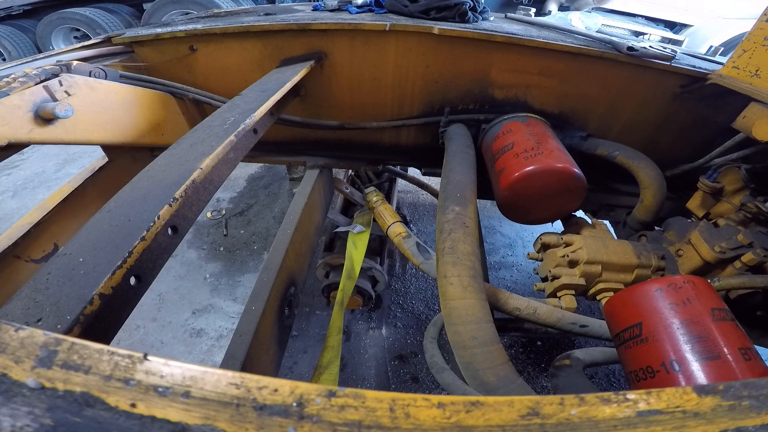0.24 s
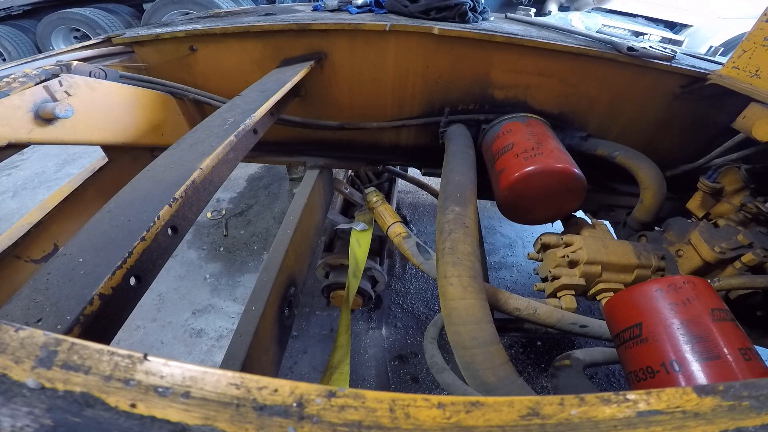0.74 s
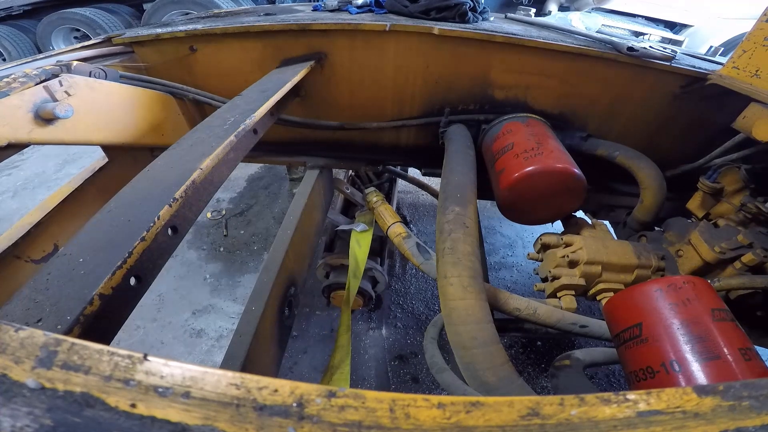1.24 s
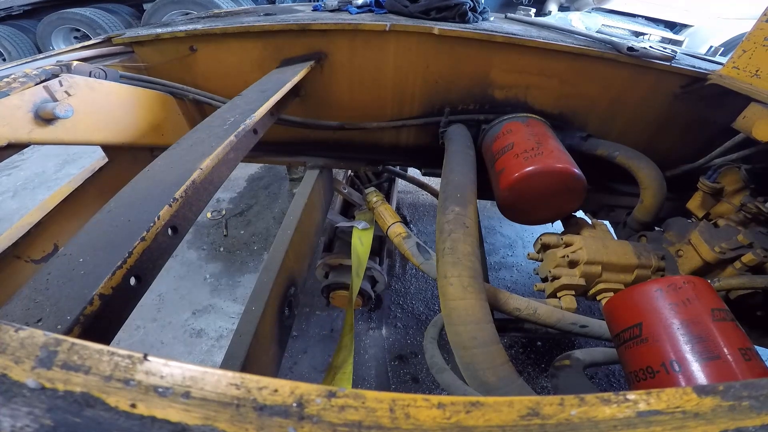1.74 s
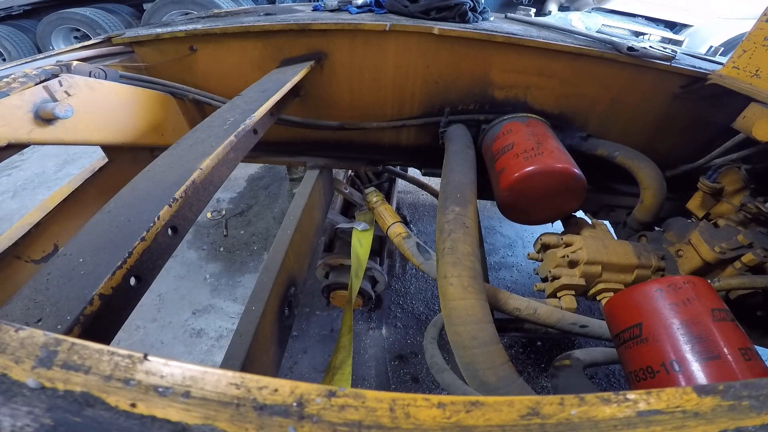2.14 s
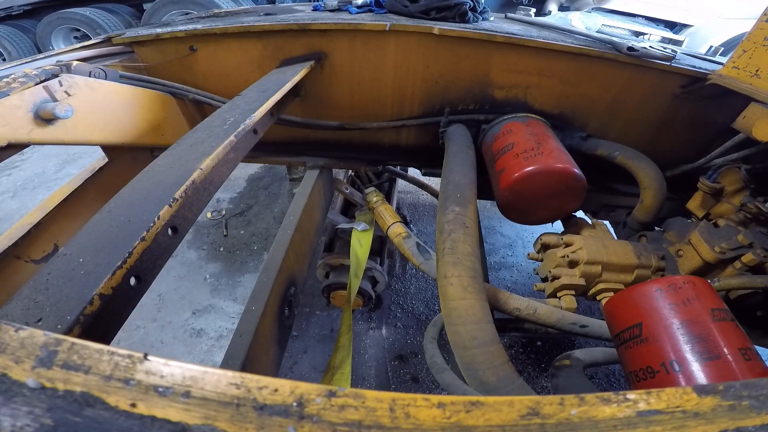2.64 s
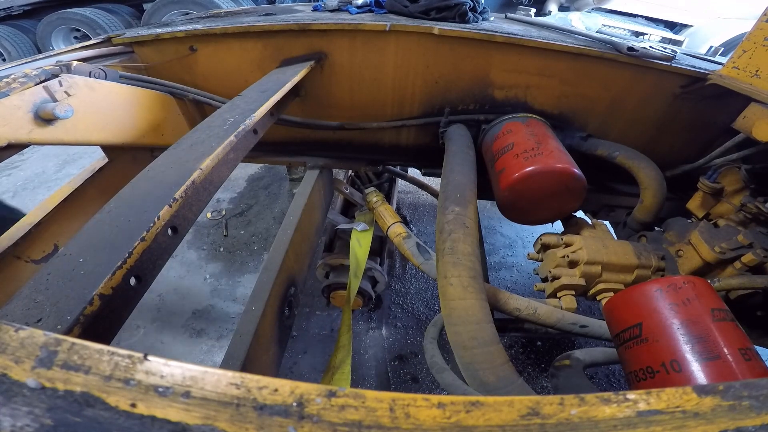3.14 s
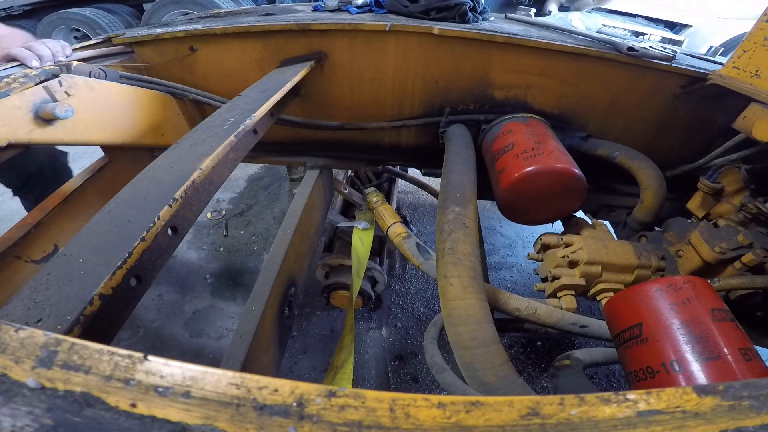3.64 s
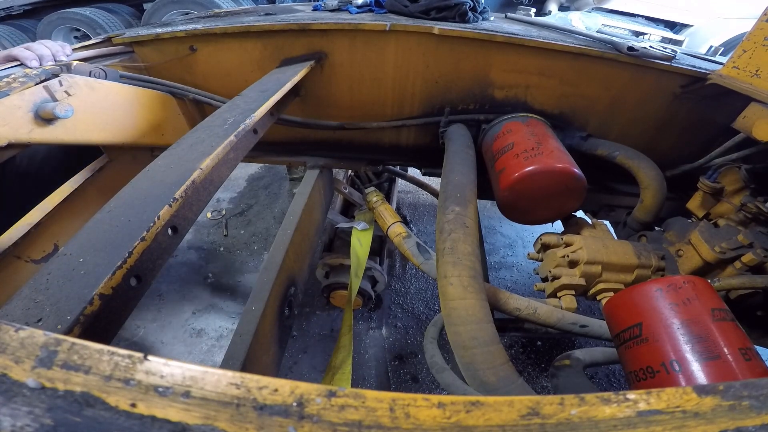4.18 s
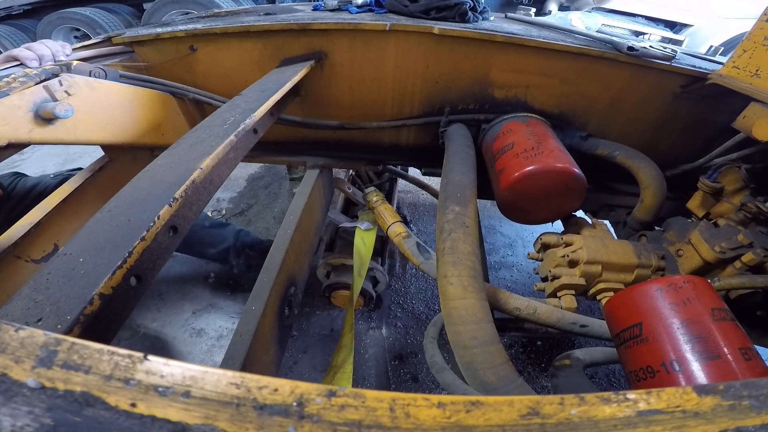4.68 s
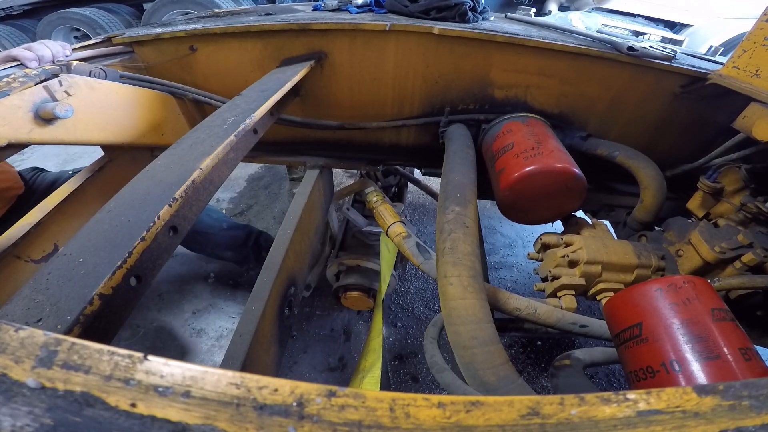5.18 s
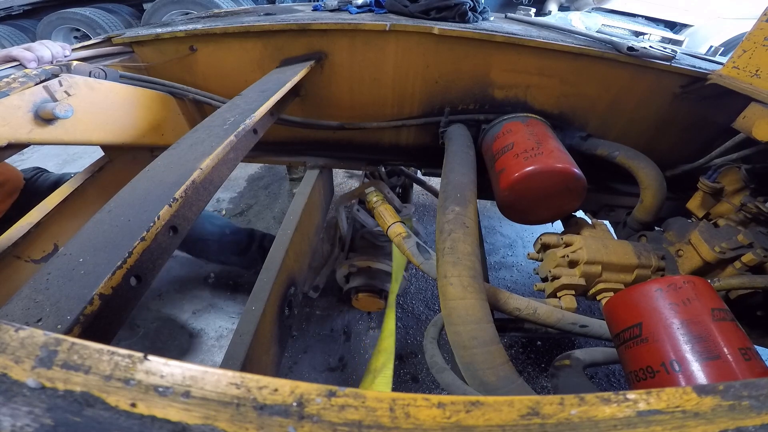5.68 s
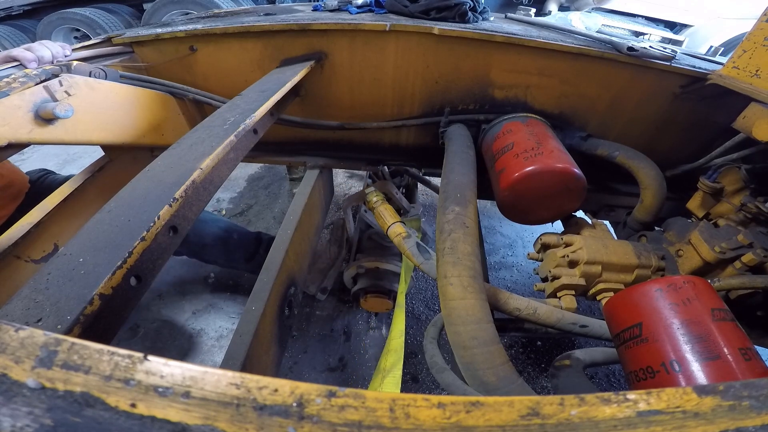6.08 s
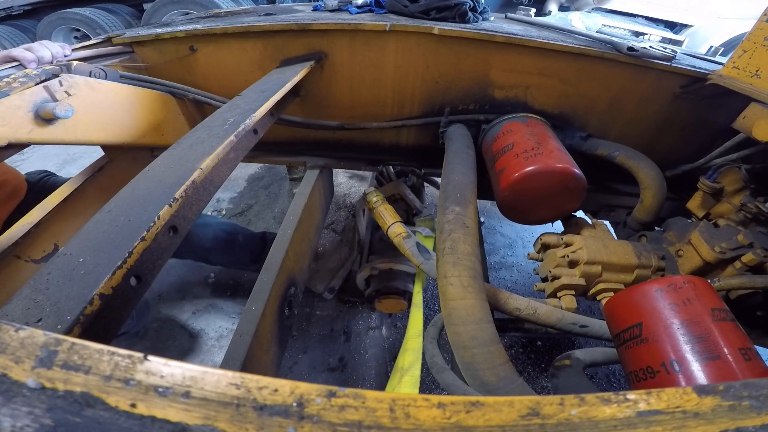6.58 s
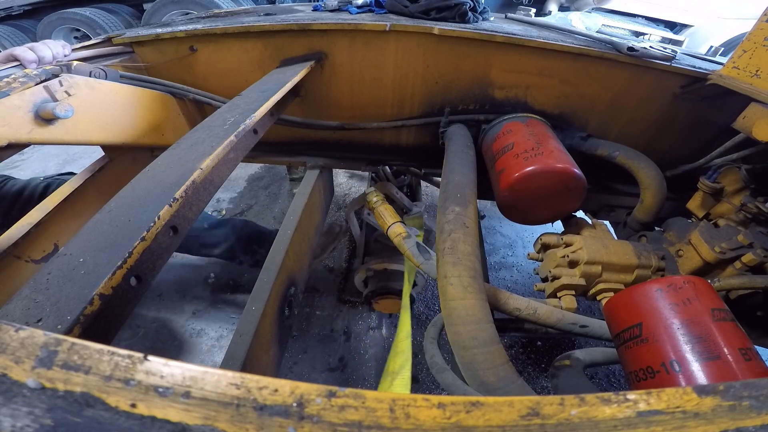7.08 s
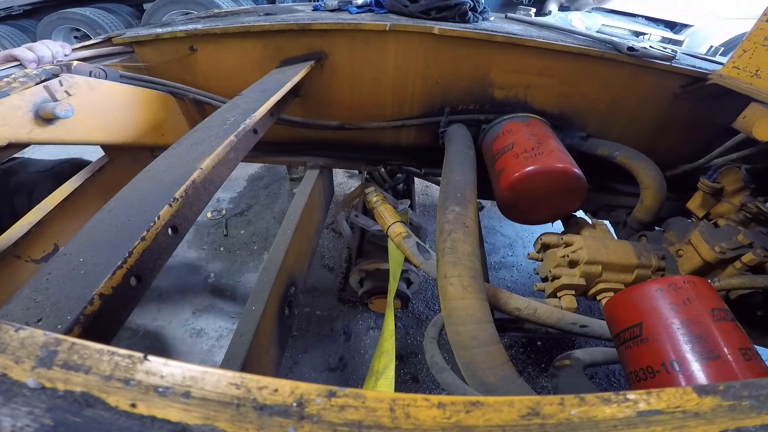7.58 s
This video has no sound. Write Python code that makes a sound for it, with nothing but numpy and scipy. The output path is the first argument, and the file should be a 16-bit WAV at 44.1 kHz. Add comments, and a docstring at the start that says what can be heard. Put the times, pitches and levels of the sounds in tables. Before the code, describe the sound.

Close, steady droning from a crane's diesel engine, mixed with rushing fan air, a hydraulic whine and fine metallic clatter.

```python
"""A four-cylinder crane diesel holds a fast idle outdoors, heard from beside its hydraulic pump.
From the start the exhaust drones at the firing rate, the cooling fan roars, the pump whines at six
strokes a turn, gears add thin tones, and every stroke and firing rattles the steel casing.
Every 1.42 s the pump load crests: the engine sags slightly and the casing rings harder.
Toward the end the ringing and the fan's growl have eased by about 2 dB."""
import sys
import numpy as np
from scipy import signal
from scipy.fft import rfft, irfft, next_fast_len
from scipy.io import wavfile
from scipy.ndimage import map_coordinates

SR = 44100
rng = np.random.default_rng(int(sys.argv[2]) if len(sys.argv) > 2 else 0)


def inscribe(sig):
    """Save sig as 16-bit PCM at rate SR to the path in sys.argv[1].

    A 1-D sig is mono; a 2-D sig holds one channel per row.
    Samples are clipped to [-1, 1] before scaling.
    """
    pcm = np.round(np.clip(np.atleast_2d(sig).T, -1, 1) * 32767)
    wavfile.write(sys.argv[1], SR, pcm.astype(np.int16))


N = 344862

IDLE_RPM, SAG_RPM = 1561.56, 2.4
FIRINGS_PER_TURN, STROKES_PER_TURN = 2, 6
LOAD_PERIOD_S, LOAD_CREST_S = 1.42, 1.63


def crank(jitter_rpm):
    """Crank angle in turns; the governed speed sags under load and jitters."""
    rpm = IDLE_RPM - SAG_RPM * pump_load() + jitter_rpm * drift(rate_hz=5)
    return np.cumsum(rpm) / 60 / SR


def exhaust(turns, offset_turns, waver):
    """Two firings a turn make a rounded sawtooth; unequal cylinders add weak orders between."""
    # Exhaust pressure wave: order/crank speed, level/dB
    orders = [(1.0, -40.4), (1.5, -53.0), (2.0, -15.1), (2.5, -39.0), (3.0, -34.4), (3.5, -43.1),
              (4.0, -18.6)]
    angle = 2 * np.pi * (turns - offset_turns)
    strength = 1 + waver * drift(rate_hz=6)
    return -strength * sum(from_db(db) * np.sqrt(2) * np.sin(k * angle) for k, db in orders)


def fan(turns, level_db, gust_db, throb):
    """Turbulent air booms in the engine bay and throbs with the firings; its growl eases."""
    # Cooling air spectrum: f/Hz, relative level/dB
    spectrum = [(20, -53), (120, -54), (168, -62), (215, -58), (290, -52.5), (335, -52.5), (365, -47.5),
                (392, -45.5), (430, -55), (540, -51.5), (730, -55), (820, -63), (1030, -60), (1250, -75),
                (2500, -100)]
    pulsation = 1 + throb * np.cos(2 * np.pi * FIRINGS_PER_TURN * turns)
    air = white() * pulsation * from_db(gust_db * drift(rate_hz=2.5))
    lowpass = signal.butter(2, 3000, fs=SR, output="sos")
    roar = signal.sosfilt(lowpass, colour(air, spectrum))
    growl_band = signal.butter(1, (480, 760), "band", fs=SR, output="sos")
    growl = signal.sosfilt(growl_band, roar)
    growl_gain = from_db(easing(db_per_s=0.32))
    return from_db(level_db) * (roar + growl * (growl_gain - 1))


def gears(turns, gain_db):
    """Gears, fan blades and shaken panels sing at multiples of half the crank speed."""
    # Machinery tones: order/crank speed, relative level/dB
    orders = [(5.5, -49.4), (7.5, -41.4), (9.0, -47.0), (10.0, -38.5), (14.0, -40.5), (15.0, -33.8),
              (15.5, -44.3), (16.0, -46.6), (22.5, -40.9), (27.0, -46.7), (29.0, -48.6), (32.0, -52.7),
              (39.0, -50.8), (50.0, -55.9), (61.0, -54.8), (68.0, -61.2), (69.0, -57.6), (70.0, -57.7),
              (88.0, -60.8), (89.0, -59.0), (92.0, -58.7), (93.0, -64.2), (99.0, -62.9), (110.0, -60.0),
              (116.0, -69.6), (122.0, -70.9), (128.0, -62.5), (130.0, -66.9), (137.0, -64.5),
              (140.0, -62.5), (148.0, -68.0), (170.0, -70.7), (200.0, -71.1), (219.5, -69.7),
              (239.5, -66.4), (255.0, -70.3)]
    return whine(turns, orders, gain_db, scatter=0.28, scatter_hz=2.8)


def pump(turns, gain_db):
    """Piston strokes ripple the oil pressure: a whine on harmonics of the stroke rate."""
    # Pressure ripple: order/stroke rate, relative level/dB
    orders = [(5, -51.1), (6, -49.2), (7, -46.1), (8, -50.1), (9, -54.1), (10, -49.8), (11, -59.4),
              (12, -50.1), (13, -56.1), (14, -59.3), (15, -58.9), (16, -67.0), (18, -69.3), (19, -67.4),
              (22, -66.6), (25, -64.1), (27, -73.4), (28, -73.9), (32, -75.4), (35, -71.5), (36, -72.2),
              (40, -65.0), (43, -73.2)]
    return whine(STROKES_PER_TURN * turns, orders, gain_db, scatter=0.2, scatter_hz=3.3)


def casing_force(turns, firing_db, hiss_db):
    """Force envelope: pump strokes, combustion knocks and steady oil hiss, summed in power."""
    strokes = knocks(turns, STROKES_PER_TURN, decay_s=0.0023, uneven_db=0.5, random_db=0)
    firings = knocks(turns, FIRINGS_PER_TURN, decay_s=0.002, uneven_db=2.0, random_db=0.7)
    firings = from_db(firing_db) * np.roll(firings, SR // 300)  # 3.3 ms later
    return np.sqrt(strokes ** 2 + firings ** 2 + from_db(hiss_db) ** 2)


def knocks(turns, per_turn, decay_s, uneven_db, random_db):
    """Envelope of decaying blows, each piston with its own strength; rms 1."""
    cycles = turns * per_turn
    blow = cycles.astype(int)
    rate_hz = cycles[-1] * SR / N
    age_s = (cycles - blow) / rate_hz
    piston_db = uneven_db * np.cos(2 * np.pi * blow / per_turn)
    scatter_db = random_db * rng.standard_normal(N)[blow]
    return rms_one(from_db(piston_db + scatter_db) * np.exp(-age_s / decay_s))


def clatter(turns, force, level_db, repeat_share):
    """Broadband steel rattle; the same parts meet every turn, so a share of it repeats."""
    # Knock spectrum radiated by the steel: f/Hz, relative level/dB
    spectrum = [(600, -80.5), (1200, -64), (1800, -67), (2400, -74), (3000, -79), (3700, -78), (4700, -82),
                (6550, -83.5), (7300, -91), (9400, -99), (10800, -109), (11700, -106), (12100, -99),
                (15000, -99)]
    turn_samples = round(N / turns[-1])
    one_turn = rng.standard_normal(SR)[:turn_samples]
    repeated = map_coordinates(one_turn, [turns % 1 * turn_samples], order=3, mode="grid-wrap")
    grain = np.sqrt(repeat_share) * rms_one(repeated) + np.sqrt(1 - repeat_share) * white()
    return from_db(level_db) * colour(force * grain, spectrum)


def casing_ring(force, gain_db, swell_db):
    """Casing and pipes ring under the force, harder at load crests, easing slowly."""
    # Steel resonances: f/Hz, nominal width/Hz, relative level/dB
    modes = [(2090, 38, -61.5), (2430, 24, -68.5), (2620, 40, -62), (3440, 32, -66), (3650, 25, -65),
             (3910, 35, -67.5), (4150, 60, -66.5), (4530, 60, -67.5), (5300, 30, -75), (5470, 25, -75.5),
             (5715, 20, -71), (5970, 50, -68), (6080, 18, -62.5), (6320, 28, -62.5), (6400, 22, -66),
             (6540, 30, -67), (6830, 60, -69), (7380, 40, -74.5), (8150, 30, -80), (8340, 60, -80),
             (12080, 90, -77), (12660, 90, -75), (13050, 90, -77.5), (13700, 130, -73), (14930, 70, -80)]
    drive = force * white()
    ringing = sum(from_db(db) * resonate(drive, hz, width_hz) for hz, width_hz, db in modes)
    return ringing * from_db(gain_db + swell_db * pump_load() + easing(db_per_s=0.24))


def pump_load():
    """Slow load swing, -1 to 1."""
    return np.cos(2 * np.pi * (np.arange(N) / SR - LOAD_CREST_S) / LOAD_PERIOD_S)


def whine(cycles, orders, gain_db, scatter, scatter_hz):
    """Shaft-locked tones; moving air and oil scatter each one's strength and phase."""
    tones = np.zeros(N)
    for k, db in orders:
        angle = 2 * np.pi * (k * cycles + rng.random())
        in_phase = (1 + scatter * drift(scatter_hz)) * np.sin(angle)
        quadrature = scatter * drift(scatter_hz) * np.cos(angle)
        tones += from_db(db + gain_db) * rms_one(in_phase + quadrature)
    return tones


def resonate(x, hz, width_hz):
    """One resonance, applied twice for steep skirts; rms 1."""
    r = np.exp(-2 * np.pi * width_hz / SR)
    section = [1 - r, 0, r - 1, 1, -2 * r * np.cos(2 * np.pi * hz / SR), r * r]
    return rms_one(signal.sosfilt([section, section], x))


def colour(x, spectrum):
    """Shape a flat sound to a spectrum; rms 1."""
    size = next_fast_len(N)
    hz, db = np.transpose(spectrum)
    bins_hz = np.maximum(np.fft.rfftfreq(size, 1 / SR), 1)
    gain = from_db(np.interp(np.log(bins_hz), np.log(hz), db))
    return rms_one(irfft(rfft(x, size) * gain, size)[:N])


def drift(rate_hz):
    """Slow random wander; rms about 1."""
    hop, settle = 40, 2000
    r = np.exp(-2 * np.pi * rate_hz * hop / SR)
    noise = rng.standard_normal(N // hop + settle + 2)
    slow = signal.lfilter([1], [1, -2 * r, r * r], noise)[settle:]
    return np.interp(np.arange(N) / hop, np.arange(len(slow)), rms_one(slow))


def easing(db_per_s):
    """Steady fall in dB, zero halfway."""
    t = np.arange(N) / SR
    return -db_per_s * (t - t.mean())


def white():
    """White noise."""
    return rng.standard_normal(N)


def from_db(db):
    """Decibels to gain."""
    return 10 ** (np.asarray(db) / 20)


def rms_one(x):
    """Scale to unit rms."""
    return x / np.sqrt(np.mean(x ** 2) + 1e-20)


def scene():
    """All sources follow one crankshaft; mono."""
    turns = crank(jitter_rpm=0.8)
    mix = exhaust(turns, offset_turns=0.388, waver=0.007)
    mix += pump(turns, gain_db=1.7)
    mix += gears(turns, gain_db=0.66)
    force = casing_force(turns, firing_db=-6, hiss_db=6.5)
    mix += clatter(turns, force, level_db=-38.0, repeat_share=0.18)
    mix += casing_ring(force, gain_db=2.0, swell_db=0.5)
    mix += fan(turns, level_db=-24.5, gust_db=0.2, throb=0.059)
    return mix[None]


def record(dry):
    """Steep low-pass at 15.25 kHz."""
    return signal.sosfilt(signal.ellip(12, 0.1, 80, 15250, fs=SR, output="sos"), dry)


dry = scene()
out = record(dry)
inscribe(out)
```